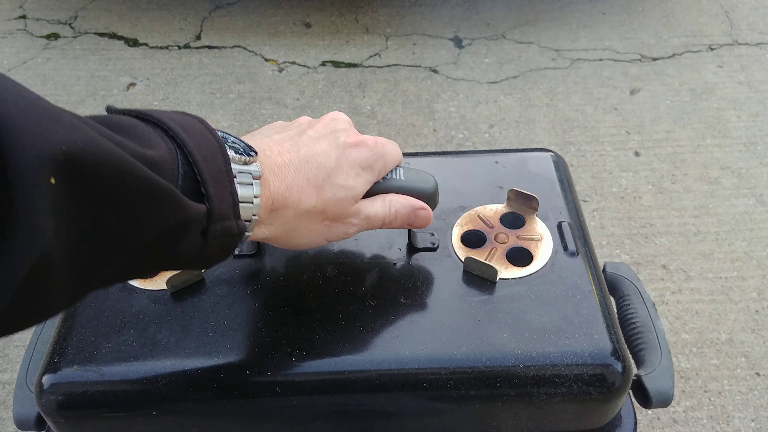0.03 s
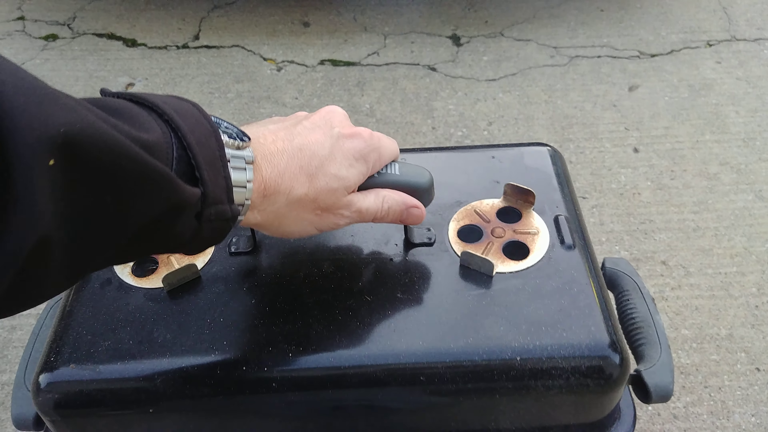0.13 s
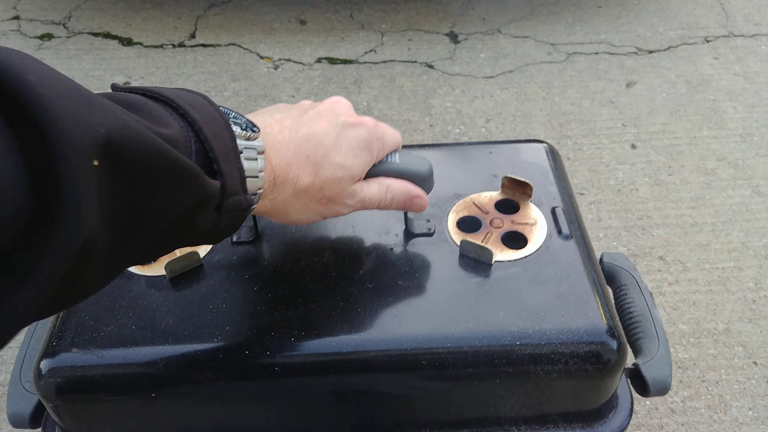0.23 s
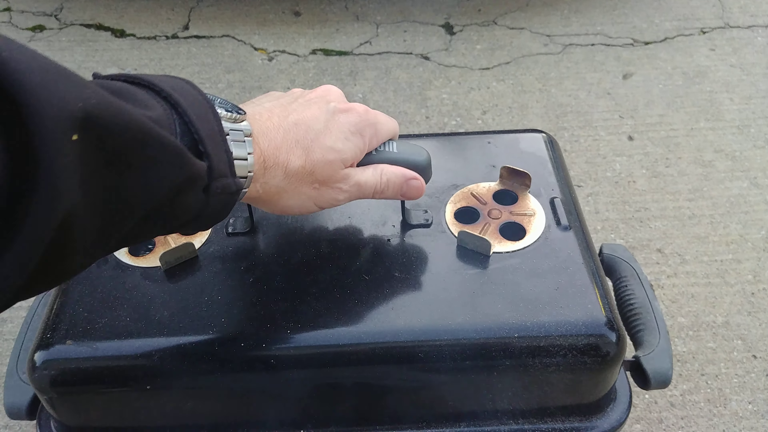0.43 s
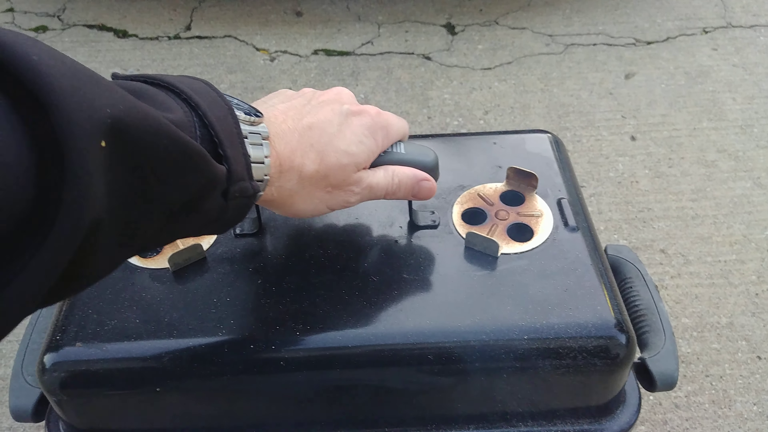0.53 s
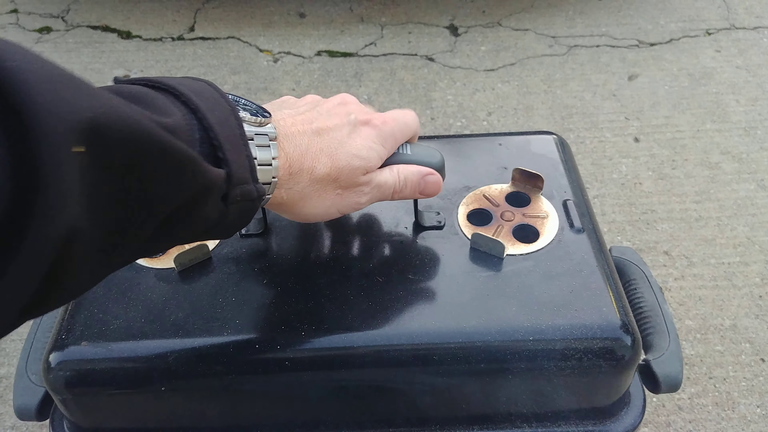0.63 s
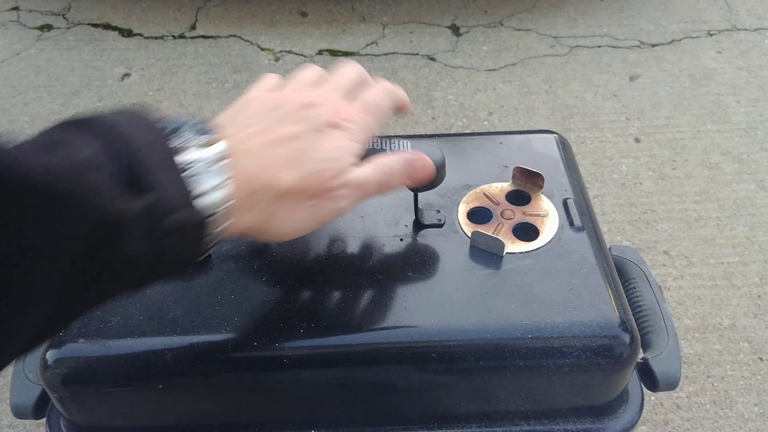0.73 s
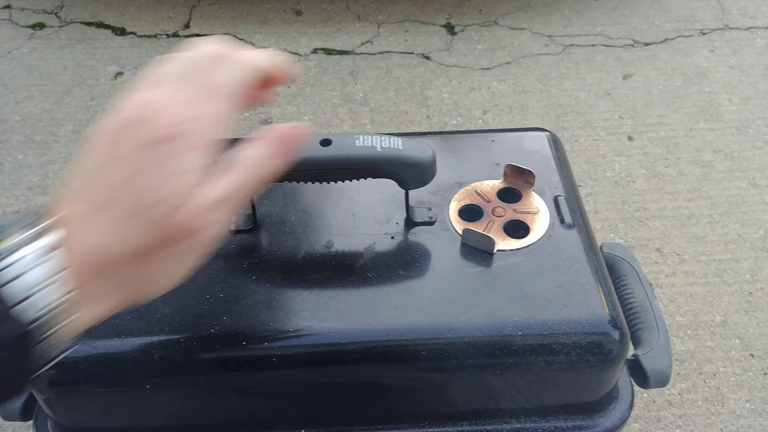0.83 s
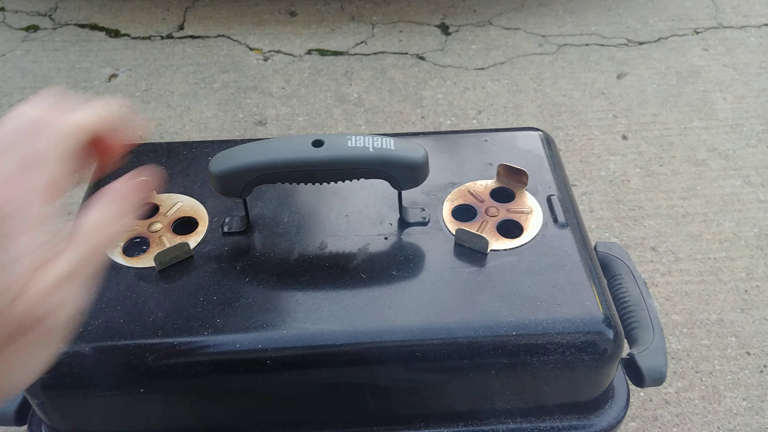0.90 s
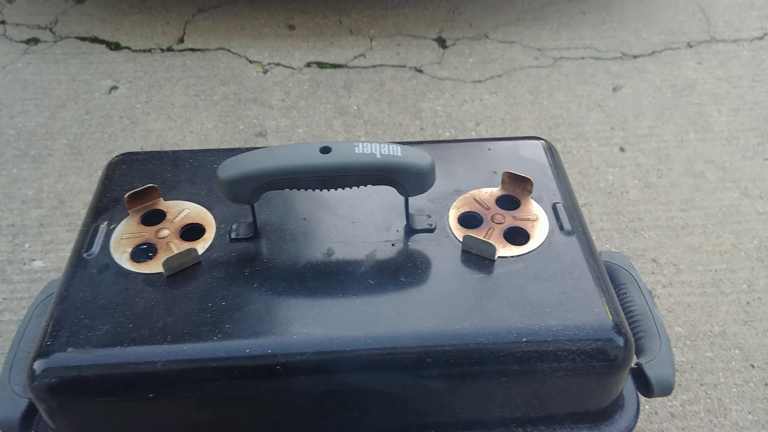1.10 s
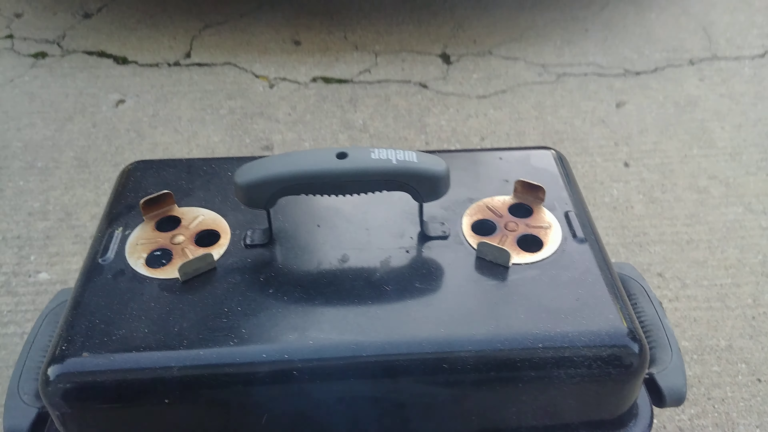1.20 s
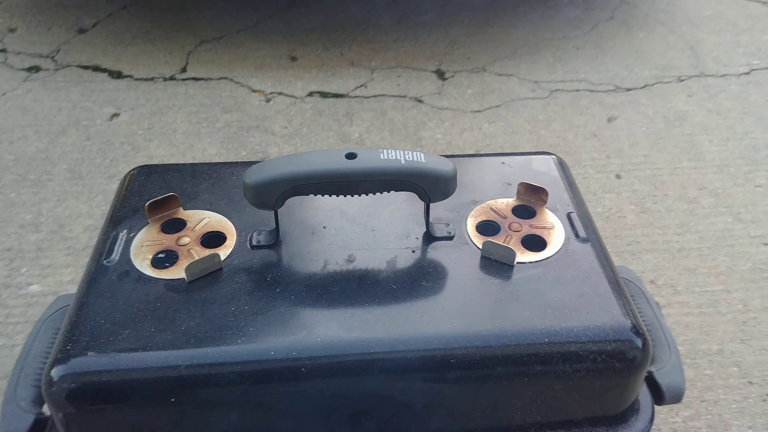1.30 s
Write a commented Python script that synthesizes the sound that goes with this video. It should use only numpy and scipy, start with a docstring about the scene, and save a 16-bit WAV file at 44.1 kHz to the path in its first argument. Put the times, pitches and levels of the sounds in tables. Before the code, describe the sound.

A small steel grill lid is pressed shut with one hollow, briefly rattling clank, close to the microphone. Faint scuffs and a soft bump follow as the hand lets go, over a low, distant outdoor rumble.

```python
"""Shutting a small grill

Outdoors, close to a handheld camera's stereo microphone, a hand presses an enamelled steel lid shut.
The lid's broad panel booms, its rim clanks and chatters on the bowl, then scrapes into its seat.
The hand lets go with faint scuffs and the camera takes a soft bump, over a low, distant rumble."""
import sys
import numpy as np
from scipy import signal
from scipy.fft import rfft, irfft
from scipy.io import wavfile
from scipy.ndimage import uniform_filter1d

SR = 44100
rng = np.random.default_rng(int(sys.argv[2]) if len(sys.argv) > 2 else 0)


def log_audio(samples):
    """Write samples as a 16-bit WAV file to the path given in sys.argv[1]."""
    # one column per channel
    frames = np.atleast_2d(samples).T
    # limit to full scale, then quantise
    limited = np.clip(frames, -1, 1)
    pcm = np.round(limited * 32767).astype(np.int16)
    wavfile.write(sys.argv[1], SR, pcm)


N = 59535
FFT_SIZE = 2 ** 16
RING_RISE_S = 0.0027

# rim on bowl: t/s, dense ring/dB, modes/dB, crack/dB, tilt/(dB per octave), left-right/dB
RIM_STRIKES = [(0.0, -14.5, -15, -25.5, -2.5, 11.5), (0.2471, -9, -13, -20.5, -5.5, 6.5),
               (0.2631, -5, -9, -3, 0, -1.5), (0.2661, -6.5, 3.5, -2.5, 0, 4),
               (0.273, -7, -15, -12.5, 3.5, 1.5), (0.2988, -10, -7, -19, -4.5, -4.5),
               (0.3086, -9.5, -24, -15, -1, -1), (0.321, -10.5, -35, -21.5, -2, -2.5),
               (0.372, -26.5, -28, -22.5, 1, 10.5)]
# how alike the two microphones hear the scene: f/Hz, correlation
MIC_LIKENESS = [(50, 1), (130, 0.93), (400, 0.62), (700, 0.67), (1300, -0.18), (5000, 0.05)]


def amp(db):
    """Decibels to gain."""
    return 10 ** (np.asarray(db) / 20)


def read(points, hz):
    """A curve on a log-frequency axis."""
    f, value = np.transpose(points)
    return np.interp(np.log(hz + 1), np.log(f + 1), value)


def pan(db):
    """Left and right gains for a level difference."""
    return amp(np.array([[.5], [-.5]]) * db)


def since(s):
    """Seconds since s, zero before it."""
    return np.maximum(np.arange(N) / SR - s, 0)


def decay(t, t60):
    """Falls a thousandfold in t60."""
    return np.exp(-np.log(1000) * t / np.maximum(t60, 1e-3))


def bins():
    """Frequencies of a padded spectrum."""
    return np.fft.rfftfreq(FFT_SIZE, 1 / SR)


def colour(x, gain):
    """Filters by a gain for each frequency."""
    return irfft(rfft(x, FFT_SIZE) * gain, FFT_SIZE)[..., :N]


def noise(spectrum):
    """Coloured noise at two microphones, alike in the bass and unrelated in the treble."""
    common, apart = rng.standard_normal((2, N))
    same = read(MIC_LIKENESS, bins())
    gain = amp(read(spectrum, bins()))
    right = colour(common, gain * same) + colour(apart, gain * np.sqrt(1 - same ** 2))
    return np.array([colour(common, gain), right])


def band_noise(centre_hz, octaves):
    """A bell-shaped band of noise, unrelated left and right."""
    band = np.exp(-.5 * (np.log2((bins() + 1) / centre_hz) / octaves) ** 2)
    return colour(rng.standard_normal((2, N)), band)


def outdoors(rumble_top_hz=350, whine_hz=1082, whine_db=-65, waver_hz=5):
    """Distant rumble, a slowly changing hiss and one faint far whine."""
    # open air: f/Hz, level/dB
    air_spectrum = [(22, -61), (38, -42), (62, -19.5), (115, -16), (165, -29), (260, -26), (420, -36),
                    (700, -41.5), (1100, -45), (1700, -55), (3200, -59.5), (7500, -61), (15000, -64.5)]
    # drift of the hiss above the rumble: t/s, level/dB
    hiss_drift = [(0, 7), (.17, 2.6), (.45, 1.7), (0.679, -2), (.86, 2.6), (1.08, -1), (1.22, -0.1),
                  (1.35, 1)]
    air = noise(air_spectrum)
    rumble = colour(air, 1 / (1 + (bins() / rumble_top_hz) ** 4))
    hiss = amp(np.interp(since(0), *np.transpose(hiss_drift))) * (air - rumble)
    waver = uniform_filter1d(rng.standard_normal(N), size=4000)
    pitch_hz = whine_hz + waver_hz * waver / waver.std()
    whine = amp(whine_db) * np.sin(2 * np.pi * np.cumsum(pitch_hz) / SR)
    return pan(5) * (rumble + hiss + whine)


def sleeve_rustle(s=1.245, width_s=0.053, db=-46):
    """A soft rustle as the arm draws back."""
    swell = np.exp(-.5 * ((since(0) - s) / width_s) ** 2)
    return amp(db) * band_noise(centre_hz=1300, octaves=0.57) * swell


def camera_bump(s=1.1462, start_hz=175, rest_hz=62, sag_s=0.007, knock_hz=600):
    """A finger shifts on the camera: a dull knock and a thud that sags in pitch."""
    t = since(s)
    burst = rng.standard_normal(N) * (t > 0) * decay(t, t60=0.063)
    knock = colour(burst, 1 / (1 + (bins() / knock_hz) ** 2))
    turns = rest_hz * t + (start_hz - rest_hz) * sag_s * (1 - np.exp(-t / sag_s))
    thud = np.sin(2 * np.pi * turns) * decay(t, t60=0.19)
    return pan(-10) * (amp(-26) * knock - amp(-24) * thud)


def handle_tick(s=0.829, db=-29):
    """One tiny dry tick as the fingers leave the handle."""
    t = since(s)
    return amp(db) * band_noise(centre_hz=2800, octaves=0.2) * (t > 0) * decay(t, t60=0.012)


def scuffs(grain_db=1.0):
    """Brief grainy friction left of centre, mostly above 4 kHz."""
    # rubs of rim, hand and sleeve: t/s, level/dB, rise/s, t60/s
    rubs = [(0.0, 0, 0.0012, 0.092), (0.114, -12, 0.0017, .16), (0.206, -8.5, 0.0027, 0.18),
            (0.234, -9, 0.011, 0.34), (0.349, -8, 0.0079, 0.16), (0.366, -1, 0.006, 0.11),
            (.42, -19, 0.06, 0.077), (.518, -16.5, 0.0024, 0.068), (.575, -10.5, 0.0018, 0.088)]
    # friction noise: f/Hz, level/dB
    rub_spectrum = [(200, -48.5), (1500, -39), (3500, -43), (5000, -35.5), (8000, -37), (12000, -40.5),
                    (15500, -39)]
    level = sum(amp(db) * np.minimum(since(s) / rise, 1) * decay(since(s + rise), t60)
                for s, db, rise, t60 in rubs)
    grain = uniform_filter1d(rng.standard_normal(N), size=50)
    return pan(7.5) * level * amp(grain_db * grain / grain.std()) * noise(rub_spectrum)


def panel_booms(sharpness=2.5):
    """The lid's panel flexes as it lands and rocks; each boom swells and dies within a few cycles."""
    # panel flexes: t/s, peak level/dB, f/Hz, swell/s, left-right/dB
    flexes = [(0.0, -18, 293.4, 0.0056, 6), (0.246, -4.5, 267, 0.0056, 8), (0.2637, -7.5, 450, 0.0031, 1),
              (.264, -1.5, 235.7, 0.0096, 1.5), (0.2902, -11.5, 270, 0.005, -2.5),
              (0.3124, -4, 275, 0.0064, 0.3), (0.3346, -16.5, 252, 0.0078, -0.5),
              (0.377, -24.5, 271, 0.0093, 8), (0.528, -29.5, 255, 0.0044, 6.5)]
    booms = 0
    for s, db, hz, swell_s, pan_db in flexes:
        t = since(s)
        swell = (t / swell_s * np.exp(1 - t / swell_s)) ** sharpness
        booms -= amp(db) * pan(pan_db) * swell * np.sin(2 * np.pi * hz * t)
    return booms


def brightness(hz, tilt_db):
    """A harder blow favours the treble: gain for a slope in dB per octave."""
    return amp(tilt_db * np.log2(np.maximum(hz, 300) / 1000))


def shell_ring():
    """Each strike feeds the shell's modes, the high ones by its hardness; they ring on and die away."""
    # modes of the steel shell: f/Hz, level/dB, t60/s, left-right/dB
    modes = [(165.7, -22, 0.25, 0), (304, -31, 0.57, 7), (332.3, -28, 0.35, -1), (383.5, -24.5, 0.23, -5.5),
             (427.4, -29, 0.27, 8.5), (579, -29.5, 0.22, 11), (613, -30.5, 0.3, 3), (682, -27.5, 0.23, 2.5),
             (833.3, -39, 0.3, 12.5), (920, -35.5, 0.3, -1), (1053, -36.5, 0.36, -5.5),
             (1265.6, -29.5, 0.3, 0), (1317, -27.5, 0.16, 3.5), (1574, -26, 0.093, 14),
             (2128, -33.5, 0.21, -3), (2927, -27, 0.18, 2.5), (3320, -31, 0.081, 5), (3335, -42, 0.29, -4)]
    ring = 0
    for hz, db, t60, pan_db in modes:
        energy = 0
        for s, _, modes_db, _, tilt_db, _ in RIM_STRIKES:
            envelope = np.minimum(since(s) / RING_RISE_S, 1) * decay(since(s), t60)
            energy += (amp(modes_db) * brightness(hz, tilt_db) * envelope) ** 2
        mic_phase = np.array([[0], [1]]) * np.arccos(read(MIC_LIKENESS, hz))
        tone = np.sin(2 * np.pi * (hz * since(0) + rng.random()) + mic_phase)
        ring += amp(db) * pan(pan_db) * np.sqrt(energy) * tone
    return ring


def rim_strike(s, ring_db, crack_db, tilt_db, pan_db, attack_s=0.00095):
    """Steel on steel, close up: an enamel tick, a short crack and a dense ring that dies band by band."""
    # the shell's dense ringing: f/Hz, level/dB
    ring_spectrum = [(60, -64.5), (200, -4.5), (420, -14.5), (700, -9), (1300, -7), (1750, -15.5),
                     (2400, -9.5), (3400, -17.5), (3800, -19), (8000, -36.5), (15000, -46)]
    # how long each band rings: f/Hz, t60/s
    ring_decays = [(200, 0.39), (1000, 0.18), (3000, 0.11), (7000, 0.29), (15000, 0.65)]
    # the crack of contact: f/Hz, level/dB
    crack_spectrum = [(40, -41), (150, 8.5), (440, 8.5), (700, 6.5), (1200, 2.5), (1800, -11.5),
                      (4000, -14), (7000, -21.5), (15000, -51)]
    t = since(s)
    tilt = brightness(bins(), tilt_db)
    dense, ring = noise(ring_spectrum), 0
    for centre_hz, t60 in ring_decays:
        band = read([(hz, float(hz == centre_hz)) for hz, _ in ring_decays], bins())
        ring += colour(dense, band * tilt) * decay(t, t60)
    ring *= np.minimum(t / RING_RISE_S, 1)
    tick = amp(-18) * colour(rng.standard_normal((2, N)), tilt) * decay(t, t60=0.0085)
    crack = colour(noise(crack_spectrum), tilt) * decay(t, t60=0.041)
    contact = (crack + tick) * np.minimum(t / attack_s, 1)
    return pan(pan_db) * (amp(ring_db) * ring + amp(crack_db) * contact)


def scene():
    """The lid closing near the microphone, the hand leaving and the yard around them."""
    clanks = sum(rim_strike(s, ring_db, crack_db, tilt_db, pan_db)
                 for s, ring_db, _, crack_db, tilt_db, pan_db in RIM_STRIKES)
    lid = panel_booms() + clanks + shell_ring()
    return lid + scuffs() + handle_tick() + camera_bump() + sleeve_rustle() + outdoors()


def record(dry, cutoff_hz=15900):
    """The camera's microphone pair colours the sound, overloads at full scale and cuts the top treble."""
    # microphone response, dipping near 10 kHz: f/Hz, level/dB
    response = [(20, -13), (60, 0), (7000, -0.5), (8100, 0.5), (8800, -8.5), (10400, -16.5), (12300, -9.5),
                (15000, -2.5)]
    # balance of the pair, duller on the right: f/Hz, left-right/dB
    balance = [(300, 0), (700, 3.5), (2400, -3), (4400, 1), (8000, 5), (14000, 6.5)]
    heard = colour(dry, amp(read(response, bins())) * pan(read(balance, bins())))
    clipped = heard / (1 + heard ** 8) ** (1 / 8)
    lowpass = signal.firwin(511, cutoff_hz, window=("kaiser", 9), fs=SR)
    return signal.oaconvolve(clipped, lowpass[None], "same")


dry = scene()
out = record(dry)
log_audio(out)
```